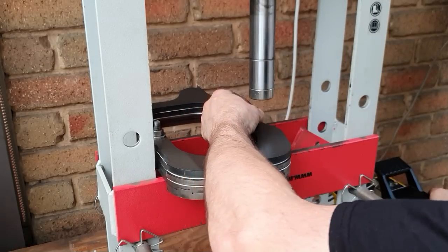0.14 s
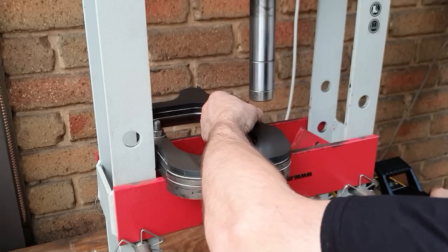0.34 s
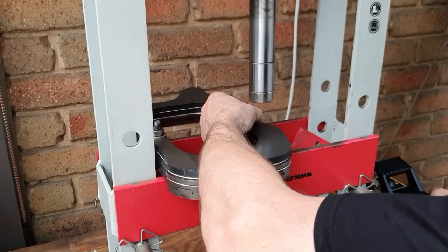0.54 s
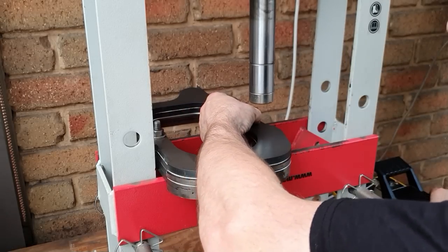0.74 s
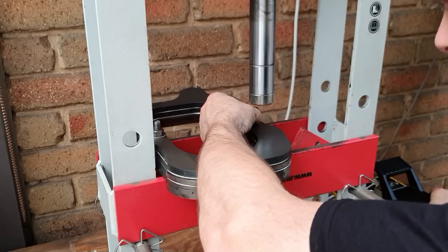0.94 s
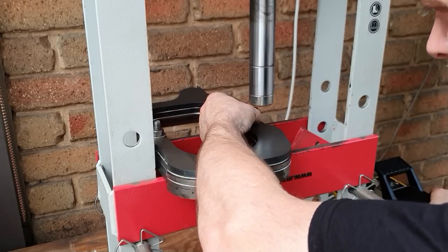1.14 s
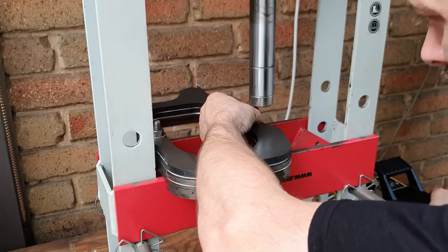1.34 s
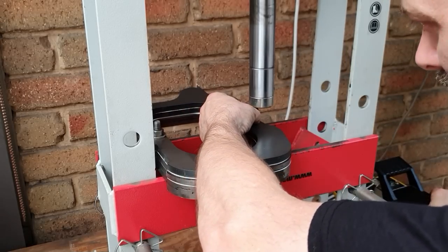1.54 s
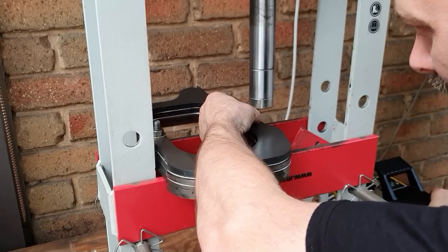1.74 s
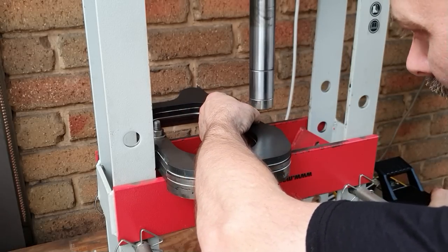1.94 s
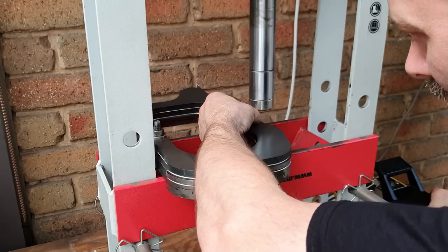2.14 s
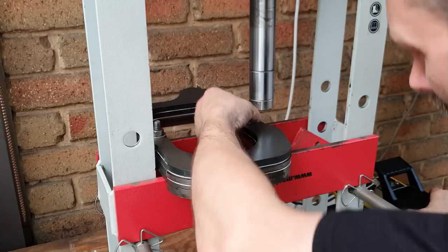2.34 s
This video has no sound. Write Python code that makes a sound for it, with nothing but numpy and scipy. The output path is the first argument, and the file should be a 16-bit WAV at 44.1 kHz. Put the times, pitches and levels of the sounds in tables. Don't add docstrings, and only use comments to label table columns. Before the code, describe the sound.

After faint hand taps, an air-powered pump on a steel press rattles rapidly and loudly for two seconds, slowing gradually, then a valve claps shut and knocks follow; close microphones, short brick room echo.

```python
import sys
import numpy as np
from scipy import signal
from scipy.fft import rfft, irfft, next_fast_len
from scipy.io import wavfile

SR = 44100
rng = np.random.default_rng(int(sys.argv[2]) if len(sys.argv) > 2 else 0)


def output_pcm(signal):
    pcm = np.clip(np.atleast_2d(signal).T, -1, 1) * 32767
    wavfile.write(sys.argv[1], SR, np.round(pcm).astype(np.int16))


def to_linear_factor(level_db):
    exponent = np.asarray(level_db, float) / 20
    return 10 ** exponent


N = 110250


def unit(x):
    return x / np.sqrt(np.mean(x ** 2) + 1e-20)


def along(points, hz):
    f, value = np.transpose(points)
    return np.interp(np.log(hz + 1), np.log(f + 1), value)


def filtered(x, response):
    m = next_fast_len(N + 8192)
    return irfft(rfft(x, m) * response(np.fft.rfftfreq(m, 1 / SR)), m)[..., :N]


# frequency in Hz, likeness from 0 to 1.
LIKENESS = [(60, .96), (290, .93), (640, .55), (1400, 0), (15000, 0)]


def noise(spectrum):
    def mid_side(hz):
        turn = np.arccos(np.clip(along(LIKENESS, hz), -1, 1)) / 2
        return to_linear_factor(along(spectrum, hz)) * np.array([np.cos(turn), np.sin(turn)])

    mid, side = filtered(rng.standard_normal((2, N)), mid_side)
    return unit(np.array([mid + side, mid - side]))


def swell(t, rise_s, t60):
    return (1 - np.exp(-t / rise_s)) * to_linear_factor(-60 * t / t60)


def repeat(shape, times, db):
    train = np.bincount(np.round(times * SR).astype(int), to_linear_factor(db), N)
    return signal.fftconvolve(train, shape)[:N]


def wander(t, width_hz):
    return np.cumsum(rng.standard_normal(len(t))) * np.sqrt(2 * np.pi * width_hz / SR)


# frequency in Hz, density in dB per Hz.
HUSH = [(25, -19), (70, 3), (300, -16), (900, -18), (2000, -14), (4500, -19.5), (7500, -38.5),
        (15000, -50.5)]


def workshop_air():
    return to_linear_factor(-41) * noise(HUSH)


# frequency in Hz, t60 in seconds.
WALLS = [(100, 0.2), (500, 0.59), (3000, 0.34), (12000, 0.34)]
# frequency in Hz, room over direct in dB.
WET = [(100, -16), (500, -10), (1500, -5), (6000, -3.5), (12000, -4)]


def room(x):
    hz, _, grains = signal.stft(rng.standard_normal((2, SR // 2)), SR, nperseg=256)
    seconds = np.arange(grains.shape[-1]) * 128 / SR
    decay = to_linear_factor(-60 * seconds / along(WALLS, hz)[:, None])
    tail = signal.istft(grains * decay, SR, nperseg=256)[1]
    late = np.pad(x, ((0, 0), (400, 0)))
    wet = signal.fftconvolve(late, tail / np.linalg.norm(tail[0]), axes=1)[:, :N]
    return filtered(wet, lambda f: to_linear_factor(along(WET, f)))


# start in seconds, peak level in dB, pitch in Hz.
KNOCKS = [
    (.021, -38, 2500),
    (.063, -47, 3500),
    (.21, -30, 291),
    (2.225, -33, 1500),
    (2.249, -20, 300),
    (2.412, -31, 1500),
    (2.438, -22, 88),
]
KNOCK_CYCLES = 4.8


def knocks(t):
    total = 0
    for start, db, hz in KNOCKS:
        breath = filtered(rng.standard_normal(len(t)), lambda f: 1 / (1 + (f / hz / 2) ** 4))
        breath = unit(breath)[:len(t)]
        tap = np.exp(-t * hz / KNOCK_CYCLES * 2) * (np.sin(2 * np.pi * hz * t) + 0.69 * breath)
        total = total + repeat(tap, np.array([start]), [db])
    return total


# frequency in Hz, density in dB per Hz.
AIR = [(1470, -22), (2500, 1), (4480, -22.5), (5460, -2), (7790, -8), (15100, -4), (16100, -35),
       (16500, -46)]


def leak():
    peak_s, peak_db, slope_db_per_s = 0.21, -52, 300
    from_peak = np.abs(peak_s - np.arange(N) / SR)
    return to_linear_factor(peak_db - slope_db_per_s * from_peak) * noise(AIR)


def vent_power(times, t):
    lead_s, rise_s, t60 = 0.014, 0.0034, 0.14
    return repeat(swell(t, rise_s, t60) ** 2, times - lead_s, np.zeros(len(times)))


def vents(power):
    return to_linear_factor(-23.5) * np.sqrt(np.abs(power)) * noise(AIR)


# frequency in Hz, density in dB per Hz.
RUSH = [(260, -33), (450, -0.5), (718, -11.5), (1020, -5.5), (1460, -15.5), (2790, -14.5), (15100, -19),
        (15800, -18), (16500, -59)]


def first_rush(times, power, t):
    start_s, rise_s, fall_s = 0.24, 0.025, 0.17
    since = np.maximum(np.arange(N) / SR - start_s, 0)
    surge = (1 - np.exp(-since / rise_s)) / (1 + since / fall_s)
    chopped = surge * np.sqrt(np.clip(power, 0, None) / (np.abs(power) + 0.13))
    opening = repeat(swell(t, 0.0034, 1.0), times[:1] - 0.016, [-27])
    return (to_linear_factor(-17.5) * chopped + opening) * noise(RUSH)


# frequency in Hz, level in dB, t60 in seconds.
VALVE = [
    (2103, -15, 0.077),
    (5160, -32, 0.27),
    (5900, -19, 0.084),
    (6000, -30, 0.2),
    (6400, -25.5, .15),
    (11200, -44, .06),
]


def valve_clap(t):
    shut_s, rise_s, blur_hz = 2, 0.00055, 70
    sides = []
    for turns in rng.uniform(0, 2 * np.pi, (2, len(VALVE))):
        clap = 0
        for (hz, db, t60), turn in zip(VALVE, turns):
            phase = 2 * np.pi * hz * t + turn + wander(t, blur_hz)
            clap = clap + to_linear_factor(db) * swell(t, rise_s, t60) * np.sin(phase)
        sides.append(repeat(clap, np.array([shut_s]), [0]))
    return np.array(sides)


def rattle_power(times, db, t):
    rise_s, t60 = 0.0024, 0.32
    return repeat(swell(t, rise_s, t60) ** 2, times, db)


# frequency in Hz, density in dB per Hz.
CLATTER = [(350, -29), (600, -8.5), (1150, -4.5), (1640, -5.5), (1930, -2), (2110, -2.5), (5240, -14.5),
           (8000, -29), (10400, -30), (17600, -120)]


def rattle(power):
    return to_linear_factor(-23.5) * np.sqrt(np.abs(power)) * noise(CLATTER)


# frequency in Hz, level in dB, t60 in seconds.
STEEL = [(1005, -35, .2), (1130, -35, .25), (1350, -36, .15), (1890, -34, .15), (1976, -27.5, .24),
         (2050, -38, .2), (2250, -37, .2), (2500, -35, .2), (2680, -38, .2), (3050, -38, .2),
         (5070, -43, .3), (5420, -41, .15), (5965, -42, .25), (12200, -47, 1.2)]


def steel_rings(times, db, t):
    rise_s, scatter_db, blur_hz = 0.0004, 2.5, 5
    scatter = scatter_db * rng.standard_normal((len(times), len(STEEL)))
    sides = []
    for turns in rng.uniform(0, 2 * np.pi, (2, len(STEEL))):
        total = 0
        for k, (hz, level, t60) in enumerate(STEEL):
            phase = 2 * np.pi * hz * t + turns[k] + wander(t, blur_hz)
            ring = swell(t, rise_s, t60) * np.sin(phase)
            total = total + repeat(ring, times, level + 0.5 * db + scatter[:, k])
        sides.append(total)
    return np.array(sides)


FRAME_RISE_S = 0.01
# frequency in Hz, density in dB per Hz.
RUMBLE = [(21, -46.5), (35, 2), (75, -3.5), (129, -13.5), (254, 0), (287, -7.5), (408, -5.5), (475, -10.5),
          (700, -37.5), (910, -60), (1540, -120)]


def rumble(times, db, t):
    power = repeat(swell(t, FRAME_RISE_S, 0.67) ** 2, times, 2 * db)
    return to_linear_factor(-25.5) * np.sqrt(np.abs(power)) * noise(RUMBLE)


# frequency in Hz, level in dB, t60 in seconds, polarity.
FRAME = [(55, -29, .3, 1), (82, -18.3, .36, 1), (130, -31, .5, -1), (174, -13.4, .1, -1),
         (239, -4.8, .051, 1), (276, -14, .142, 1), (297, -2.3, .05, -1), (339, -15.2, .117, 1),
         (376, -24, .19, -1), (477, -11.8, .05, 1), (523, -15.6, .05, 1), (560, -33, .3, 1)]


def thumps(times, db, t):
    thump = 0
    for hz, level, t60, polarity in FRAME:
        thump = thump + polarity * to_linear_factor(level) * swell(t, FRAME_RISE_S, t60) * np.sin(2 * np.pi * hz * t)
    return repeat(thump, times, db - 0.03)


# start in seconds, strength in dB.
BLOWS = [(0.2276, 3.5), (0.2715, -4), (.2902, -1), (.308, -13), (0.3271, -28), (0.3424, 0), (0.3801, -5.5),
         (0.4171, -5.5), (0.4552, -2.5), (0.4941, -4.5), (0.5317, -9), (.57, -5.5), (0.6088, -6),
         (0.6484, -8), (0.6928, -4), (0.7393, -5), (0.7864, -2.2), (0.8329, -5.3), (0.8802, -1.9),
         (0.9307, -2.8),
         (0.9807, -2), (1.0352, -1.5), (1.0937, -2.8), (1.1587, -2.2), (1.2246, -0.8), (1.2859, -2.5),
          (1.339, -1.6), (1.39, -0.5), (1.44, -2.5), (1.4887, -2), (1.5381, -1.5), (1.59, -1.2),
          (1.6462, -1.5), (1.7019, -0.9), (1.762, -1.3), (1.8208, -2), (1.8784, -1), (1.9403, -1),
          (2.0074, 0), (2.0812, -1), (2.1662, 0.2)]


def scene():
    frame_lead_s, steel_lag_s = 0.0031, 0.0015
    pan_db, mic_lag_s = -0.5, 0.00011
    times, db = np.transpose(np.array(BLOWS))
    times = times - frame_lead_s
    steel_times = times + steel_lag_s
    t = np.arange(SR // 2) / SR

    vent = vent_power(steel_times, t)
    shaken = rattle_power(steel_times, db, t)
    near = knocks(t) + leak() + valve_clap(t)
    near = near + vents(vent) + first_rush(steel_times, vent + shaken, t) + rattle(shaken)
    near = near + steel_rings(steel_times, db, t) + rumble(times, db, t) + thumps(times, db, t)

    lag = mic_lag_s * np.array([[1], [-1]])
    near = near * to_linear_factor([[pan_db], [-pan_db]])
    near = filtered(near, lambda f: np.exp(-1j * np.pi * f * lag))
    return near + room(near) + workshop_air()


def low_pass(x):
    return signal.sosfilt(signal.butter(12, 16940, fs=SR, output="sos"), x)


# time in seconds, level in dB.
FADE = [(0, -14), (.1, -5.5), (.2, 2), (2.2, 1), (2.349, -3.5), (2.5, -20)]


def record(dry):
    top_hz, edge_hz = 16100, 200
    faded = dry * to_linear_factor(np.interp(np.arange(N) / SR, *np.transpose(FADE)))
    mix = filtered(faded, lambda hz: np.clip((top_hz - hz) / edge_hz, 0, 1))
    return low_pass(mix)


dry = scene()
out = record(dry)
output_pcm(out)
```